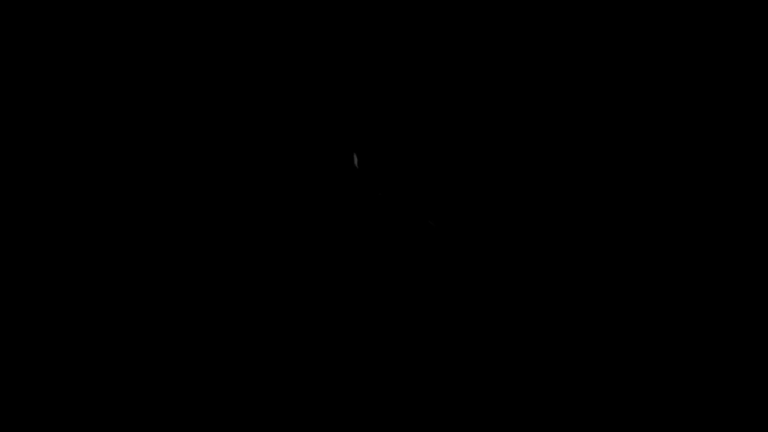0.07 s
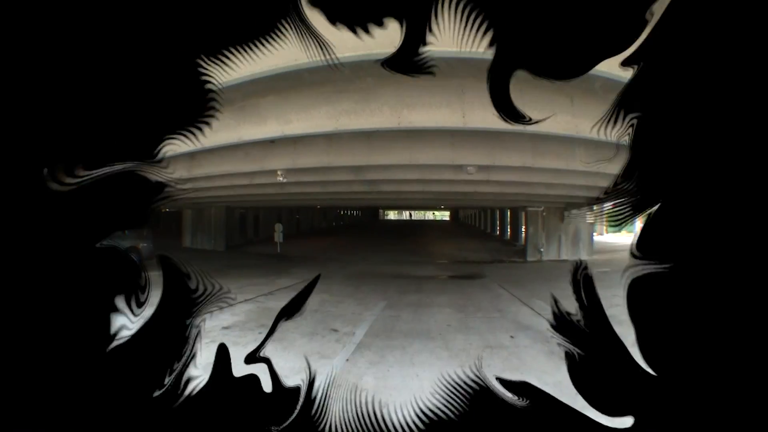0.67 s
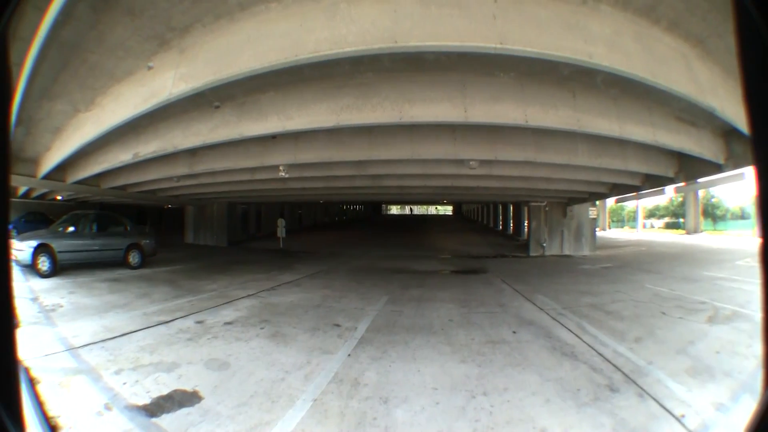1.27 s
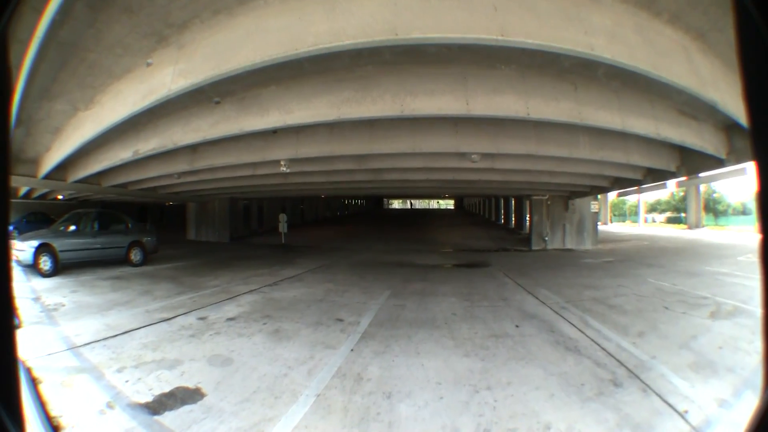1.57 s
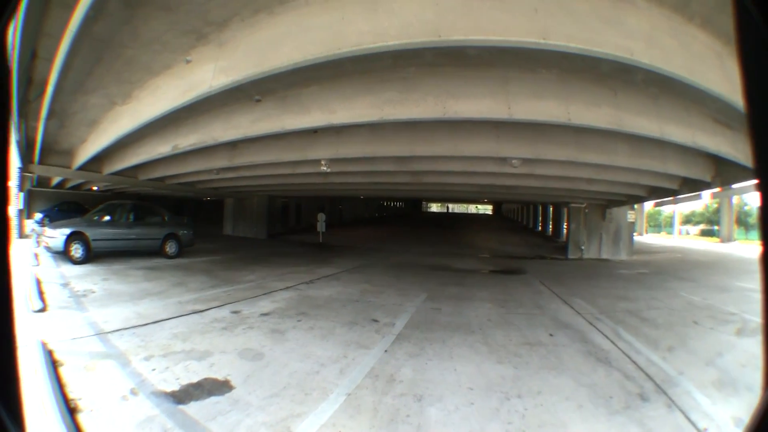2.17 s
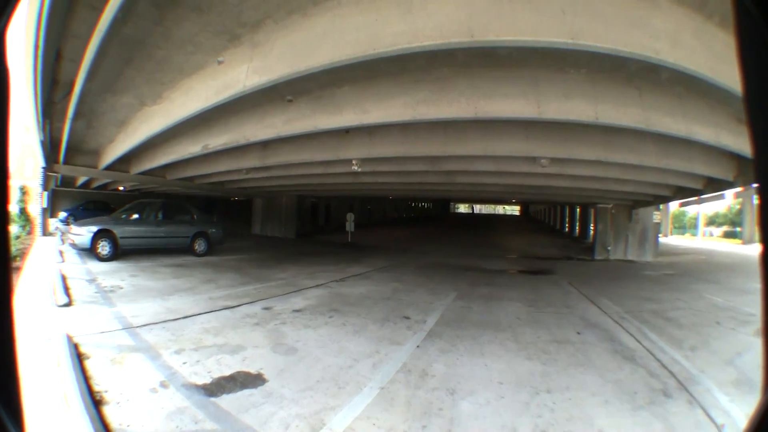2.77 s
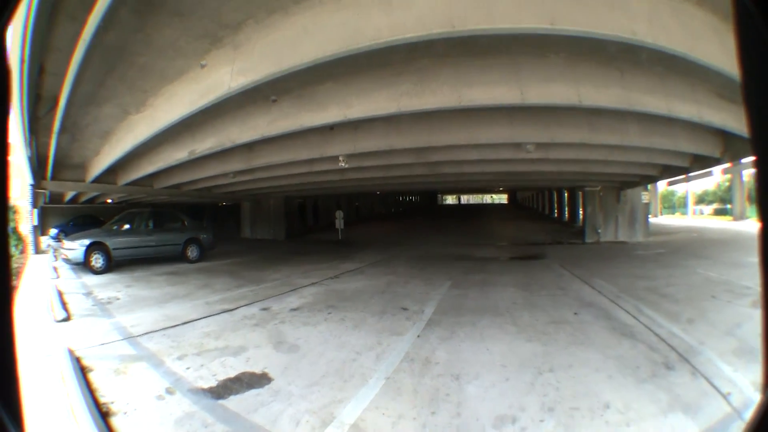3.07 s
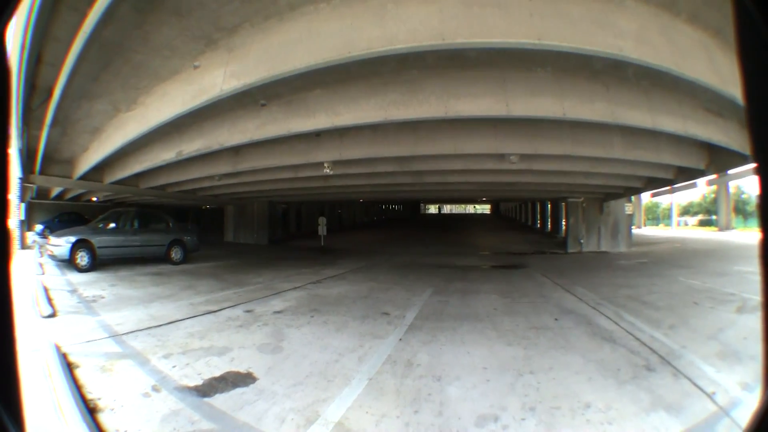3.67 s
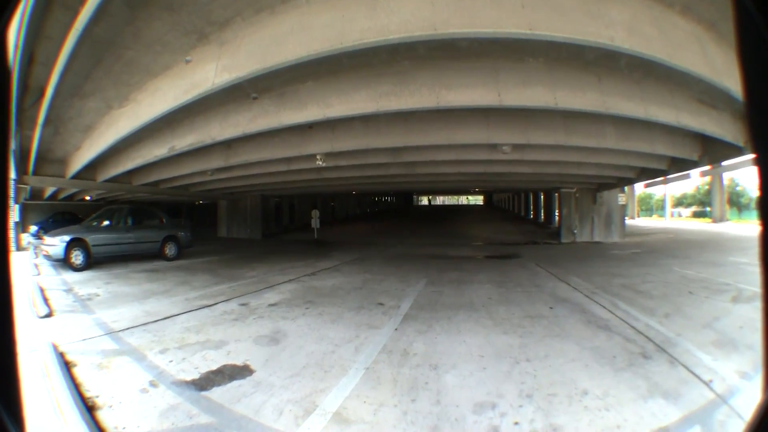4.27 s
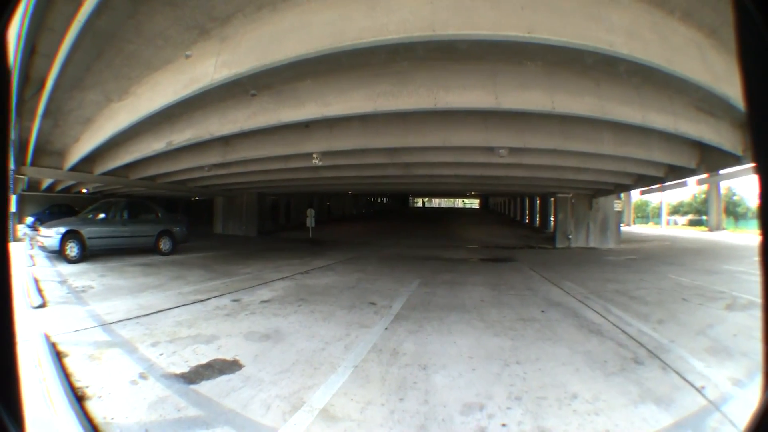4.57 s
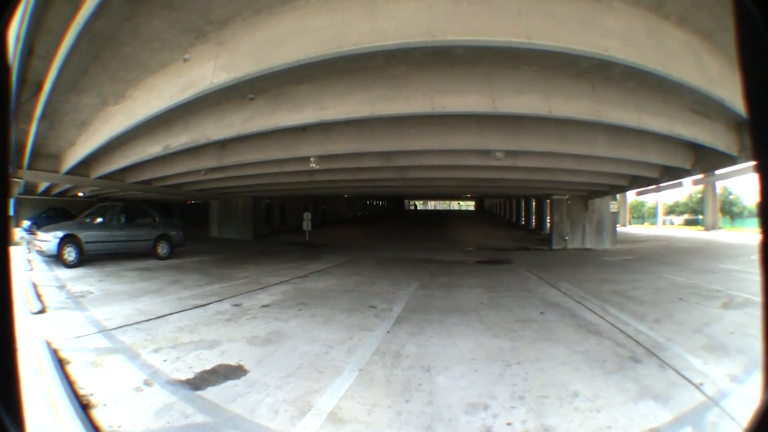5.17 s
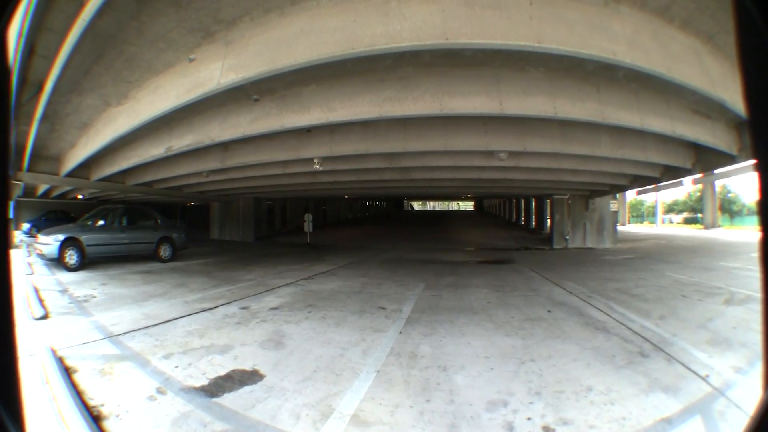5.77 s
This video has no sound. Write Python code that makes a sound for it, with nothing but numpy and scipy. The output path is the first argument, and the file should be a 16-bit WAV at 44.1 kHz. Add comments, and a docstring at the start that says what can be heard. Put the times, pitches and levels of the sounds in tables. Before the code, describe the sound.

Traffic builds outside a concrete parking deck, heard through a hand-held microphone. It starts quietly, with a fading echo, distant road murmur, a low hum and a faint high buzz. Then several vehicles go by in overlapping waves of tyre rush and droning engines, with a brief whine after the loudest stretch. Small rubs, rustles and dry ticks come from the handling of the microphone.

```python
"""An open concrete parking deck. At first a bright echo dies away over a low machine hum, the murmur
of far roads and a thin, high buzz like insects. From about two seconds, vehicles passing outside
swell into engine rumble and tyre roar, rippled by the beams, with engine notes and low drones.
Faint ticks, rustles and rubs sound close to the hand-held camera, the sharpest tick just after
four seconds, where the traffic is fullest. A tyre whine follows, and tyres still rush at the end."""
import sys
import numpy as np
from scipy import signal
from scipy.fft import rfft, irfft, next_fast_len
from scipy.io import wavfile
from scipy.ndimage import uniform_filter1d, map_coordinates

SR = 44100
rng = np.random.default_rng(int(sys.argv[2]) if len(sys.argv) > 2 else 0)


def transcribe(u):
    """Save the signal u as a 16-bit wav file named by the first command-line argument.

    u: samples, shape (n,) or (channels, n), limited to [-1, 1]; the rate is SR.
    q: integer samples, one column per channel.
    """
    v = np.clip(np.atleast_2d(u).T, -1, 1)
    q = np.round(v * 32767).astype(np.int16)
    wavfile.write(sys.argv[1], SR, q)


N = 265482
TIME = np.arange(N) / SR


def amp(db):
    """Decibels to gain."""
    return 10 ** (np.asarray(db) / 20)


def unit(x):
    """Scale to rms 1."""
    return x / np.sqrt(np.mean(x ** 2) + 1e-20)


def along(points, hz):
    """Read (freq_hz, value) points on a log axis."""
    points_hz, values = np.transpose(points)
    return np.interp(np.log(hz + 1), np.log(points_hz + 1), values)


def fader(points):
    """Join (time_s, level_db) points into one level per sample."""
    return np.interp(TIME, *np.transpose(points))


def wobble(rate):
    """A smooth random curve, rate knots a second."""
    knots = rng.standard_normal(int(N * rate / SR) + 4)
    coarse_s = np.linspace(0, N / SR, 8 * len(knots))
    return np.interp(TIME, coarse_s, map_coordinates(knots, [coarse_s * rate]))


def swell(peak_s, width_s):
    """A bell-shaped rise and fall."""
    return np.exp(-0.5 * ((TIME - peak_s) / width_s) ** 2)


def filtered(x, response):
    """Shape x with a gain that depends on frequency."""
    size = next_fast_len(N + SR // 2)
    return irfft(rfft(x, size) * response(np.fft.rfftfreq(size, 1 / SR)), size)[..., :N]


# Stereo image, narrow lows and wide highs: freq_hz, left_right_correlation
STEREO_LIKENESS = [(60, 0.97), (125, 1), (250, 0.98), (500, .96), (1200, 0.96), (2200, 0.9), (4000, 0.83),
                   (8000, 0.23), (13000, .05)]

def diffuse(response):
    """Noise of rms 1 at two close microphones: alike in the bass, unrelated in the treble."""
    size = next_fast_len(N, real=True)
    hz = np.fft.rfftfreq(size, 1 / SR)
    points_hz, likeness = np.transpose(STEREO_LIKENESS)
    alike = np.interp(np.log(hz + 1), np.log(points_hz), likeness)
    white = rng.standard_normal((2, 2 * len(hz))).view(complex)
    mid, side = irfft(white * response(hz) * np.sqrt([1 + alike, 1 - alike]), size)[:, :N]
    return unit(np.array([mid + side, mid - side]))


def rush(eq):
    """Diffuse noise through an EQ curve, rolling off an octave beyond each end."""
    low_hz, high_hz = eq[0][0] / 2, eq[-1][0] * 2
    skirts = lambda hz: 1 / (1 + (hz / high_hz) ** 4) / (1 + (low_hz / (hz + 1)) ** 4)
    return diffuse(lambda hz: amp(along(eq, hz)) * skirts(hz))


# Pass-bys on the road: nearest_s, to_half_power_s, rumble_db, roar_db, edge_db
PASS_BYS = [(1.15, 0.18, -60, -51.5, -67), (2.1, 0.47, -48.5, -48, -78), (2.88, 0.079, -57, -42.5, -55.5),
            (3.18, 0.14, -45, -39.5, -49), (3.71, 0.21, -45, -39.5, -44), (4.12, 0.55, -38.5, -37, -46.5),
            (4.86, 0.64, -46, -38, -43), (5.3, 0.17, -53.5, -43, -48.5), (5.96, 0.13, -52.5, -36, -42.5)]
# Steady traffic bed behind them: rumble_db, roar_db, edge_db
TRAFFIC_BED = (-50, -62.5, -59)

def pass_levels():
    """Rumble, roar and edge in dB: each vehicle's power falls with distance squared, and all add up."""
    power = np.outer(amp(TRAFFIC_BED) ** 2, np.ones(N))
    for nearest_s, to_half_power_s, *levels_db in PASS_BYS:
        nearness = 1 / (1 + ((TIME - nearest_s) / to_half_power_s) ** 2)
        power += np.outer(amp(levels_db) ** 2, nearness)
    return 10 * np.log10(power)


# Engine rumble, tyre roar, the tyres' bright edge and fine hiss: freq_hz, gain_db
RUMBLE_EQ = [(20, -57.5), (45, -43.5), (76, -27), (105, -13), (135, -11.5), (165, -6), (218, -2), (255, -1),
             (380, -2), (445, -6), (620, -24.5), (1200, -72)]
ROAR_EQ = [(150, -42), (330, -13.5), (440, -6), (560, -2.5), (720, -5), (850, -8), (1000, -14.5),
           (1300, -36), (2500, -64.5)]
EDGE_EQ = [(500, -35), (800, 3), (980, -1.5), (1170, 0.5), (1400, -6.5), (1850, -12), (2200, -21),
           (3200, -36), (6000, -74)]
HISS_EQ = [(1200, -14.5), (2200, -1), (3000, 1.5), (4000, 0), (4800, -4), (6600, -6), (7300, -15),
           (10000, -32)]
# The hiss builds with the traffic: time_s, level_db
HISS_FADER = [(.1, -75), (1.2, -71), (2.4, -69), (3.1, -65), (3.8, -62.5), (4.7, -61.5), (5.4, -64),
              (6.0, -64.5)]

def traffic():
    """Engines and tyres swell with each pass under a fine hiss; the upper bands flutter together."""
    rumble_db, roar_db, edge_db = pass_levels()
    flutter = wobble(14)
    rumble = amp(rumble_db) * rush(RUMBLE_EQ)
    roar = amp(roar_db + 0.25 * flutter) * rush(ROAR_EQ)
    edge = amp(edge_db + 0.5 * flutter) * rush(EDGE_EQ)
    hiss = amp(fader(HISS_FADER) + 0.26 * flutter + 0.46 * wobble(90)) * rush(HISS_EQ)
    return rumble + roar + edge + hiss


# Engine notes from the road: peak_s, half_length_s, pitch_hz, glide_hz_per_s, level_db
ENGINE_NOTES = [(2.062, 0.18, 473, 9, -46), (2.1, 0.33, 254.7, -13.5, -53),
                (1.98, 0.089, 178.5, 0.5, -51.5), (2.26, 0.066, 180.2, 0.5, -46),
                (2.222, 0.092, 247, -11, -50), (2.565, 0.082, 246, -1.5, -48.5),
                (3.104, 0.28, 195.5, 0.5, -48), (3.27, 0.22, 233.3, 11, -48), (3.72, 0.17, 186.5, 8.5, -44),
                (4.118, 0.19, 187.7, -4, -41.5), (4.24, 0.1, 246, -10, -42), (4.85, .08, 264, -40, -42.5),
                (5.075, 0.22, 188.3, -3, -51), (5.577, 0.33, 241, -0.5, -48.5)]

def engines(waver_hz=1.697, tremble_db=2.3):
    """Engine notes rise, hold and drop away as vehicles move by, gliding and wavering in pitch."""
    out = np.zeros(N)
    for peak_s, half_length_s, pitch_hz, glide_hz_per_s, level_db in ENGINE_NOTES:
        held = 1 / (1 + ((TIME - peak_s) / half_length_s) ** 6)
        tremble = amp(tremble_db * wobble(11))
        hz = pitch_hz + glide_hz_per_s * (TIME - peak_s) + waver_hz * wobble(8)
        out += amp(level_db) * held * unit(tremble * np.sin(2 * np.pi * np.cumsum(hz) / SR))
    return out


# Low drones and a tyre whine: peak_s, width_s, pitch_hz, bandwidth_hz, level_db
DRONES = [(0.56, 0.15, 193, 9.6, -55), (0.45, 0.21, 296, 19, -51), (0.36, 0.27, 384, 19, -51.5),
          (.43, 0.058, 122, 18, -51.5), (2.13, 0.53, 868, 31, -53.5), (3.9, 0.16, 145, 30, -52.5),
          (4.85, 0.29, 592, 50, -40), (5.2, 0.1, 660, 14, -42), (4.56, 0.18, 470, 9.2, -45.5),
          (4.3, 0.73, 311, 35, -45), (3.91, 0.38, 345, 86, -41.5)]

def drones():
    """Narrow low drones and a tyre whine swell and fade as traffic passes."""
    out = np.zeros((2, N))
    for peak_s, width_s, pitch_hz, bandwidth_hz, level_db in DRONES:
        band = diffuse(lambda hz: 1 / (1 + (2 * (hz - pitch_hz) / bandwidth_hz) ** 2))
        power = np.abs(uniform_filter1d(np.mean(band ** 2, axis=0), size=SR // 10))
        even_band = band / np.sqrt(power + 1e-9)
        out += amp(level_db) * swell(peak_s, width_s) * even_band
    return out


def beams(x, ripple_db):
    """Reflections off pillars and beams, as a random, shifting ripple across the spectrum."""
    spectra = signal.stft(x, nperseg=2048)[2]
    ripple = rng.standard_normal(spectra.shape[1:])
    ripple = uniform_filter1d(ripple, size=2, axis=0)  # smooth over frequency
    ripple = uniform_filter1d(ripple, size=16, axis=1)  # and over time
    gain = unit(amp(ripple_db * unit(ripple)))
    return signal.istft(spectra * gain, nperseg=2048)[1][:, :N]


# Small dry ticks: start_s, level_db, pitch_hz, spread_log_ratio, t60_s
DRY_TICKS = [(0.84, -59, 1800, .35, 0.08), (.972, -62, 2200, .35, 0.065), (1.492, -69, 5470, .35, .04),
             (1.787, -62, 2870, .35, 0.052), (2.29, -66, 3830, .5, .06), (2.637, -48, 1500, .35, 0.1),
             (2.776, -52, 2700, 0.28, .04), (4.264, -38, 1730, .13, 0.07), (4.263, -51.5, 2600, .5, 0.066),
             (4.948, -48, 5500, .3, 0.008), (4.953, -45, 3600, .25, 0.021), (4.948, -61, 13400, .25, 0.012),
             (4.9535, -56, 13000, .25, .012)]

def ticks(attack_s=0.00056):
    """Each tick is a short, softly starting noise burst spread around its own pitch."""
    out = np.zeros((2, N))
    for start_s, level_db, pitch_hz, spread, t60_s in DRY_TICKS:
        burst = diffuse(lambda hz: 1 / (1 + np.abs(np.log((hz + 1) / pitch_hz) / spread) ** 3))
        age = np.maximum(TIME - start_s, 0)
        out += amp(level_db - 60 * age / t60_s) * (1 - np.exp(-age / attack_s)) * burst
    return out


# Soft rustles: peak_s, width_s, scrape_db, brush_db
RUSTLE_STROKES = [(.87, 0.038, -63.5, -91), (2.33, .07, -68, -84), (2.606, .02, -72, -78),
                  (2.7, 0.099, -58.5, -72), (2.78, .008, -55.5, -80), (3.445, .03, -55.5, -68.5),
                  (3.538, 0.027, -51.5, -75), (3.62, 0.055, -60, -87), (4.19, 0.012, -60, -72),
                  (4.45, 0.18, -65.5, -73), (4.77, 0.025, -62, -65), (4.88, 0.13, -53.5, -69),
                  (4.99, 0.025, -64, -82), (5.16, 0.03, -68, -68.5)]
# Thin rubs of the camera's casing: peak_s, width_s, low_squeak_db, high_squeak_db
CASING_RUBS = [(2.55, .012, -91, -86), (2.618, .013, -85, -77.5), (2.78, 0.009, -65, -66.5),
               (4.76, .03, -75, -79), (4.945, .012, -78, -75)]
# Dull scrape, bright brush and the two squeaks: freq_hz, gain_db
SCRAPE_EQ = [(800, 1.5), (1800, 9.5), (2600, -3), (4000, -5), (7000, -17), (9500, -22.5), (15000, -32)]
BRUSH_EQ = [(2000, -9), (4200, -1.5), (6600, 2.5), (7600, -10), (9300, -3), (10300, -18), (11600, -6),
            (12600, -15), (15000, -13)]
LOW_SQUEAK_EQ = [(2000, -9), (3500, -5), (5500, -10), (6500, 3), (7600, 6), (8600, -16), (11000, -24)]
HIGH_SQUEAK_EQ = [(9000, -25), (12400, -13), (13400, -1), (14400, 1), (15700, -7)]

def handling():
    """Friction close to the microphones makes soft rustles and a few thin rubs."""
    rustles = friction(RUSTLE_STROKES, [SCRAPE_EQ, BRUSH_EQ])
    rubs = friction(CASING_RUBS, [LOW_SQUEAK_EQ, HIGH_SQUEAK_EQ])
    return rustles + rubs


def friction(strokes, eqs, grain_db=2.5):
    """Grainy swells of rubbing noise; each level column drives one EQ curve."""
    grain = unit(amp(grain_db * wobble(400)))
    envelopes = sum(np.outer(amp(dbs), swell(peak_s, width_s)) for peak_s, width_s, *dbs in strokes)
    return grain * sum(envelope * rush(eq) for envelope, eq in zip(envelopes, eqs))


# Bright reverb tail: freq_hz, gain_db
ECHO_EQ = [(500, -1), (1200, 7.5), (1700, -2), (2300, 2), (2900, -5.5), (4100, -6), (5300, -13),
           (7500, -24), (12000, -34)]

def echo(start_db=-50.5, t60_s=1.66):
    """The bright tail of an earlier noise dies away under the ceiling."""
    return amp(start_db - 60 * TIME / t60_s) * rush(ECHO_EQ)


# Ebb and flow of the far roads: time_s, level_db
CITY_FADER = [(.1, -48), (.45, -54.5), (.8, -49.5), (1.6, -52.5), (2.3, -46.5), (3.4, -51.5), (5.3, -47),
              (6.0, -58.5)]
# Their dark tone: freq_hz, gain_db
CITY_EQ = [(20, -44), (38, -23), (47, -34), (60, -17.5), (80, -18.5), (96, -7), (106, -15), (121, 1),
           (141, -4.5), (180, -1), (300, -18.5), (510, 2), (650, -24), (1000, -41.5)]

def city():
    """The low murmur of roads farther off."""
    return amp(fader(CITY_FADER) + 0.84 * wobble(3.6)) * rush(CITY_EQ)


# Slow drift of the machine hum: time_s, level_db
HUM_FADER = [(.1, -70), (.7, -67), (1.3, -73), (2.4, -68.5), (4.2, -79), (6.0, -68)]

def hum(pitch_hz=59.3, lower_hz=53.7):
    """Far machinery throbs as two tones beat; its reflections differ at each microphone."""
    tone = lambda hz: np.sin(2 * np.pi * np.cumsum(hz + 0.24 * wobble(3.6)) / SR)
    throb = unit(tone(pitch_hz) + amp(-6.5) * tone(lower_hz))
    reflections = amp(-12.5) * np.array([tone(pitch_hz), tone(pitch_hz)])
    return amp(fader(HUM_FADER)) * (throb + reflections)


# Swells of the high buzz: time_s, level_db
BUZZ_FADER = [(.05, -78), (.33, -76.5), (.7, -79.5), (1.2, -83), (1.65, -75), (1.95, -78.5), (2.3, -82),
              (3.2, -77), (4.6, -88), (5.2, -78), (5.9, -89)]
# Its thin, peaky tone: freq_hz, gain_db
BUZZ_EQ = [(3000, -23), (4200, -9), (5600, -16), (6250, -9), (6470, 0), (6680, -4.5), (6850, -14),
           (7050, -17.5), (9000, -40)]

def buzz():
    """A thin shimmer like insects in the trees outside, swelling and easing."""
    return amp(fader(BUZZ_FADER) + 1.2 * wobble(60)) * rush(BUZZ_EQ)


# Rise and fall of the top-end air: time_s, level_db
AIR_FADER = [(.1, -90), (1.2, -86), (2.4, -83), (3.1, -80), (3.5, -76), (4.0, -76), (4.8, -73),
             (5.4, -78.5), (6.0, -78.5)]
# Its sheen: freq_hz, gain_db
AIR_EQ = [(3000, -34), (6000, -13), (7800, 0), (9200, 2), (10200, -2.5), (11600, -1), (12600, -6.5),
          (14500, -7.5), (15700, -18)]

def air():
    """An airy top hiss rises and falls, flickering slightly."""
    flicker_db = 0.7 * wobble(120) + 0.72 * wobble(17)
    return amp(fader(AIR_FADER) + flicker_db) * rush(AIR_EQ)


def scene():
    """Everything heard from the middle of the deck."""
    road = beams(traffic(), ripple_db=1.62) + engines() + drones() + air()
    background = city() + hum() + buzz() + beams(echo(), ripple_db=2.0)
    return road + background + handling() + ticks()


# Balance between the two microphones: freq_hz, left_minus_right_db
MIC_BALANCE = [(60, -0.5), (125, 1), (250, 0.7), (600, -1.5), (1200, -0.3), (2400, 0), (8000, 0),
               (13000, 0)]

def record(dry, self_noise_db=-88, start_s=0.041, fade_s=0.009, top_hz=15720):
    """Two slightly unequal microphones hiss faintly; both ends fade quickly and the top is cut."""
    heard = dry + amp(self_noise_db) * rng.standard_normal((2, N))
    fade = np.clip(np.minimum(TIME - start_s, TIME[-1] - TIME) / fade_s, 0, 1)
    balance = lambda hz: amp(np.outer([0.5, -0.5], along(MIC_BALANCE, hz)))
    return filtered(heard * fade, lambda hz: balance(hz) * (hz < top_hz))


dry = scene()
out = record(dry)
transcribe(out)
```